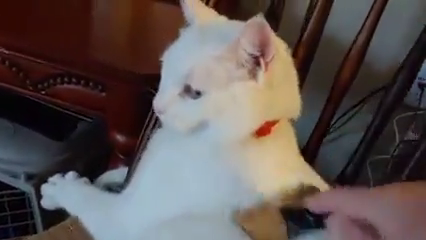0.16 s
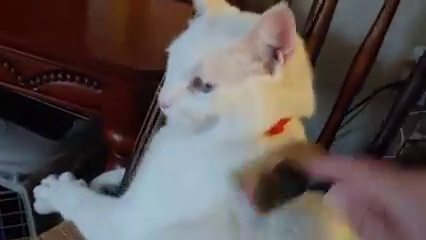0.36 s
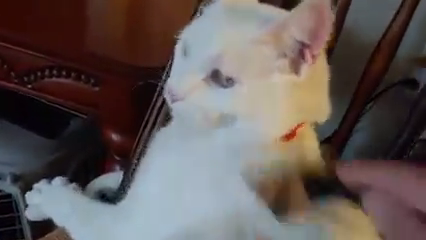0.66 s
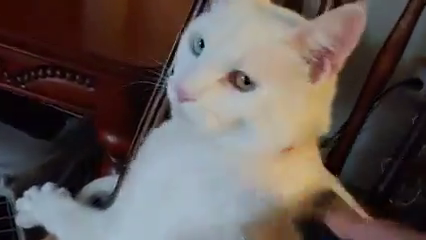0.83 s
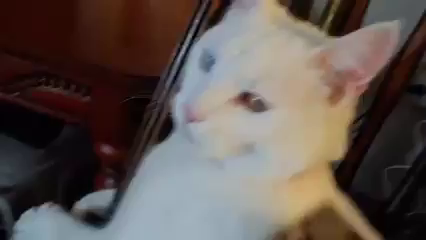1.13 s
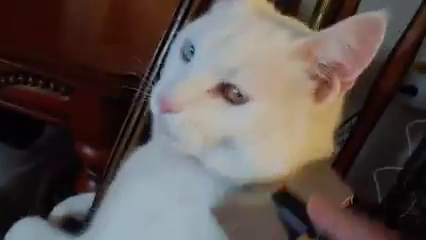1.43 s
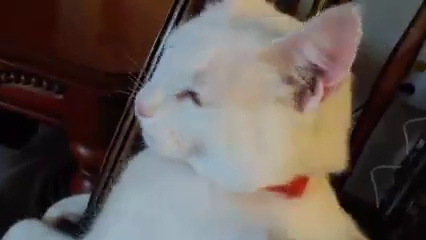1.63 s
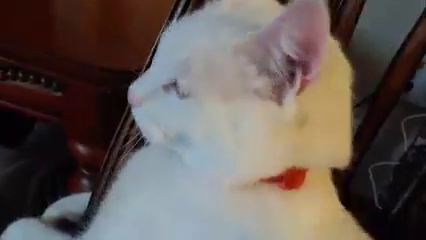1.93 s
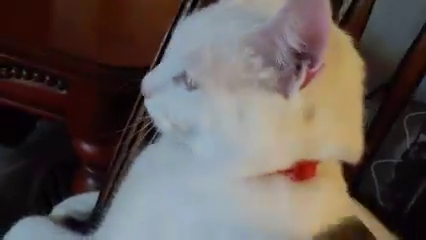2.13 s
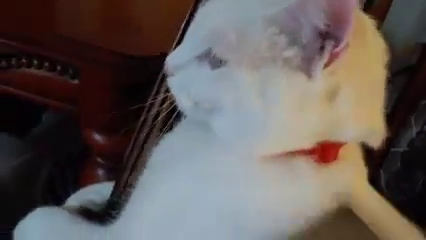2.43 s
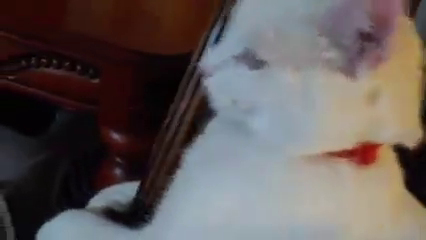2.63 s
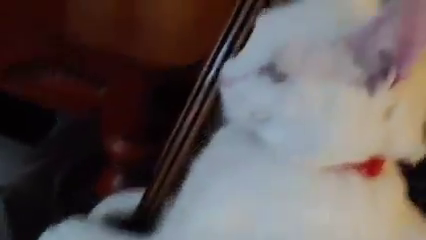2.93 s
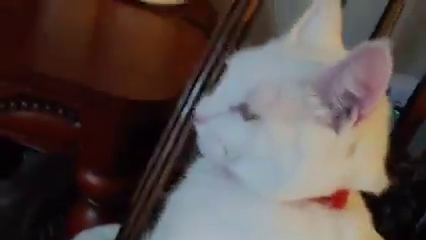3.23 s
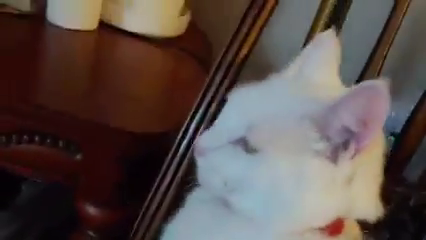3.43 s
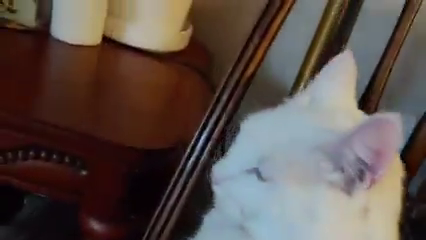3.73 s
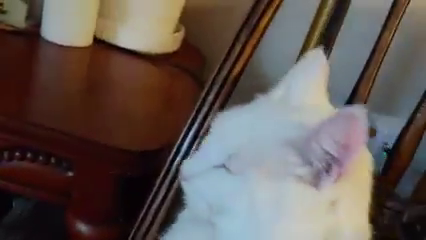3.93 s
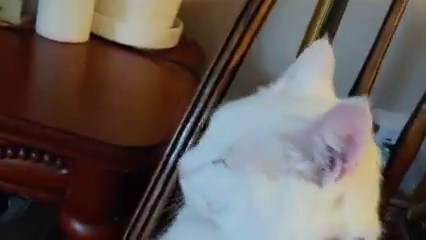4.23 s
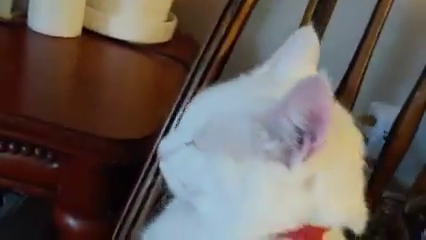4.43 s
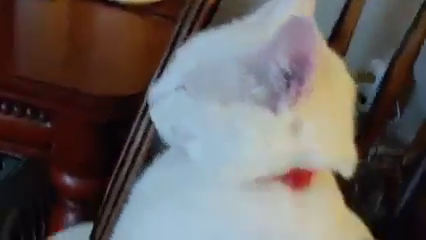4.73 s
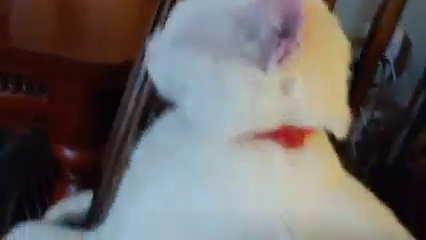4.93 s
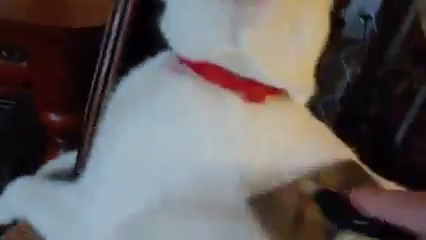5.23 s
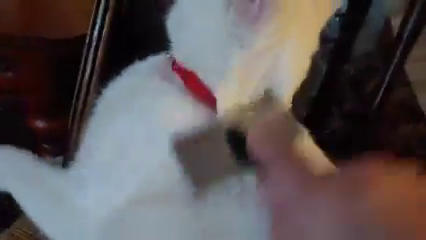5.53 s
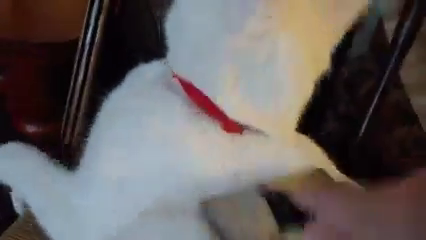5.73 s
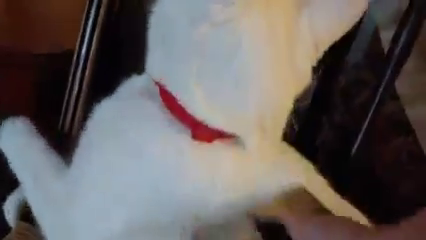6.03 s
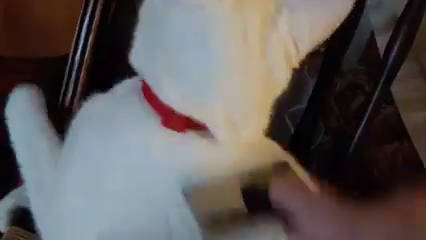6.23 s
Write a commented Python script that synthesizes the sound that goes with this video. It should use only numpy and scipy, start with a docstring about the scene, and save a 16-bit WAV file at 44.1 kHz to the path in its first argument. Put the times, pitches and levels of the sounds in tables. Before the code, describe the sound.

A close stereo pickup in a quiet furnished room with faint air noise and low appliance hum. From the start a wire-pin brush strokes a cat's coat roughly three times a second, each a soft crunchy pat followed by a bright, crackling, hissing rake. Around 1.6 to 1.8 seconds a firmer stroke snags: several sharp ticks, a short thin metallic ring, soft bumps, and the pulsing purr growing clearer until about 2.1. Lighter strokes continue, with a dull thump and small ticks near 3.0. From 3.7 strokes are more widely spaced; fluttering nose hiss comes at about 4.0 to 4.4, then a hollow wooden knock at 4.5. A strong rake peaks near 5.1. From 5.7 to 5.95 the loudest pin snaps crack toward the left with a faint wire ring, then quick brushing runs to the end at about 6.3 seconds.

```python
"""Pins crackle through fur: about three times a second a wire-pin brush pats down on a cat and rakes its coat.
Rakes are random pin flicks over sliding hiss, shaped by the pins' resonances; pats are short dense crunches.
Snagged pins tick, and freed wires ring as damped modes; the wooden chair bumps and knocks.
The cat purrs in pulses, as chest thumps and nose hiss; filtered noise and wavering tones make a quiet room."""
import sys
import numpy as np
from scipy import signal
from scipy.fft import rfft, irfft, next_fast_len
from scipy.io import wavfile
from scipy.ndimage import map_coordinates

SR = 44100
rng = np.random.default_rng(int(sys.argv[2]) if len(sys.argv) > 2 else 0)


def waveform_to_disk(signal):
    """Save audio, clipped to [-1, 1], as 16-bit WAV at the path in sys.argv[1]."""
    frames = np.transpose(np.atleast_2d(signal))
    scaled = np.clip(frames, -1, 1) * 32767
    samples = np.round(scaled).astype(np.int16)
    wavfile.write(sys.argv[1], SR, samples)


N = 280917  # length in samples


def amp(db):
    """Decibels to gain."""
    return 10 ** (np.asarray(db) / 20)


def unit(x):
    """Scale to rms 1."""
    return x / np.sqrt(np.mean(x ** 2) + 1e-20)


def clock():
    """The time of every sample, in seconds."""
    return np.arange(N) / SR


def curve(rows, t):
    """(s, value) rows joined by straight lines."""
    return np.interp(t, *np.transpose(rows))


def along(points, hz):
    """(Hz, value) points joined on a log frequency axis."""
    point_hz, values = np.transpose(points)
    return np.interp(np.log(hz + 1), np.log(point_hz + 1), values)


def wobble(x):
    """A smooth random curve with one knot per unit of x."""
    return map_coordinates(rng.standard_normal(int(x.max()) + 4), [x])


def coloured(x, spectrum, extra_db=lambda hz: 0):
    """Causal (minimum-phase) filter with the given spectrum."""
    size = 2 * next_fast_len(x.shape[-1] // 2 + 2048)
    hz = np.fft.rfftfreq(size, 1 / SR)
    gain = amp(along(spectrum, hz) + extra_db(hz))
    # folding the cepstrum onto positive time gives the minimum phase
    cepstrum = irfft(np.log(gain + 1e-6))
    cepstrum[1:size // 2] *= 2
    cepstrum[size // 2 + 1:] = 0
    response = np.exp(rfft(cepstrum))
    return irfft(rfft(x, size) * response, size)[..., :x.shape[-1]]


def pair(three, alike):
    """Left and right from one shared and two separate signals."""
    share = np.clip(alike, 0, 1)
    return np.sqrt(share) * three[0] + np.sqrt(1 - share) * three[1:]


def panned(x, pan_db):
    """Share the power between left and right; positive is left."""
    return x * unit(amp([[pan_db / 2], [-pan_db / 2]]))


def add(track, s, sound, lead_ms=0):
    """Mix a stereo sound in at time s, the right side earlier by lead_ms."""
    right = round(s * SR)
    left = right + round(lead_ms * SR / 1000)
    for side, start in enumerate([left, right]):
        part = sound[side, max(-start, 0):max(N - start, 0)]
        track[side, max(start, 0):][:len(part)] += part


def ring(modes, t, scatter_db):
    """Damped modes, at random phases and scattered strengths on each side."""
    out = 0
    for hz, db, t60 in modes:
        strength = amp(db + scatter_db * rng.standard_normal((2, 1)) - 60 * t / t60)
        out = out + strength * np.sin(2 * np.pi * hz * t + rng.uniform(0.17, 1, (2, 1)))
    return out


# still air's spectrum: pitch_hz [Hz], level_db [dB per Hz, relative]
AIR_SPECTRUM = [(20, -29), (40, 2), (70, 9.5), (110, -4), (250, -5.5), (350, -10), (950, -10),
                (1500, -22.5), (2500, -25), (5000, -29.5), (8000, -16.5), (11000, -35.5), (15500, -31)]
# appliance hum tones: pitch_hz [Hz], level_db [dB rms before the waver]
HUM_TONES = [(70.5, -69.5), (120, -79), (180, -76), (240, -76)]


def background(air_db=-66.5):
    """Still room air as filtered noise, and the hum of an appliance as tones wavering in level and phase."""
    air = unit(coloured(pair(rng.standard_normal((3, N)), 0.31), AIR_SPECTRUM))
    hum = 0
    for hz, db in HUM_TONES:
        level = amp(db + 4 * wobble(6 * clock())) * np.sqrt(2)
        hum = hum + level * np.sin(2 * np.pi * (hz * clock() + .2 * wobble(7 * clock())))
    return panned(amp(air_db) * air + hum, 0.19)


# room decay: pitch_hz [Hz], t60_s [s]
ROOM_DECAY = [(200, 0.37), (2000, 0.22), (7000, 0.1), (14000, 0.25)]


def room(x):
    """The furnished room answers with a brief noise tail, each frequency fading at its own rate."""
    hz, t, z = signal.stft(rng.standard_normal((2, SR // 3)), SR, nperseg=256)
    fade = amp(-60 * t / along(ROOM_DECAY, hz)[:, None])
    tail = signal.istft(z * fade, SR, nperseg=256)[1]
    tail = np.pad(tail / np.linalg.norm(tail[0]), ((0, 0), (SR // 400, 0)))  # the answer starts 2.5 ms late
    return signal.fftconvolve(x, tail, axes=1)[:, :N]


# chest purr, before trim and swell: time_s [s], level_db [dB]
PURR_LEVEL = [(0.0, -78), (1.01, -74), (1.84, -55), (2.0, -53.5), (2.13, -62.5), (2.41, -76), (2.91, -63.5),
              (3.12, -70), (4.06, -63.5), (5.48, -70), (5.92, -61.5), (6.37, -68)]
# chest resonances: pitch_hz [Hz], level_db [dB per Hz, relative]
CHEST_SPECTRUM = [(30, -21), (62, -4), (115, 1.5), (175, -2), (290, -4), (470, -7), (620, -20.5),
                  (790, -37.5), (950, -12.5), (1150, -43), (2000, -51.5)]
# fluttering hiss at the nose: time_s [s], level_db [dB]
FLUTTER_LEVEL = [(1.48, -85), (1.54, -59), (1.66, -61), (1.72, -80), (1.9, -72), (1.99, -61), (2.05, -90),
                 (3.94, -88), (3.99, -61.5), (4.13, -57), (4.2, -62), (4.38, -58), (4.44, -68), (4.48, -73)]
# nose hiss spectrum: pitch_hz [Hz], level_db [dB per Hz, relative]
NOSE_SPECTRUM = [(1500, -5.5), (4000, -30), (6000, -10), (7300, 13), (8800, 0.5), (10500, -30),
                 (15000, -46)]
# the chest sounds louder under each stroke: by how much, at what share of the swing, how wide
SWELL_DB, SWELL_AT, SWELL_S = 7, 0.68, 0.13


def pressure(t):
    """How firmly the brush leans on the cat, 0-1: one swell for each stroke."""
    swells = [np.exp(-((t - s - SWELL_AT * swing) / SWELL_S) ** 2) for s, _, _, swing, *_ in STROKE_LIST]
    return np.max(swells, axis=0)


def purr(purr_hz=29, pulse_decay=1.7, uneven_db=4.5, throat_db=4, chest_db=-5):
    """The larynx chops the cat's airflow: soft, uneven thumps in the chest, puffs of hiss at the nose."""
    t = clock()
    turns = np.cumsum(purr_hz * (1 + .06 * wobble(9 * t))) / SR
    air = unit(np.exp(-pulse_decay * (turns % 1)) * pair(rng.standard_normal((3, N)), 1.0))
    beats = unit(np.diff(np.floor(turns), prepend=0))
    drive = (air + .55 * beats) * amp(uneven_db * wobble(12 * t))
    # the cat shifts, and its body slowly trades one set of resonances for another
    shift = np.pi / 4 * (1 + np.tanh(2 * wobble(4 * t)))
    chest = 0
    for share in (np.cos(shift), np.sin(shift)):
        body = coloured(drive, CHEST_SPECTRUM, lambda hz: throat_db * wobble(hz / 28))
        chest = chest + share * unit(body)
    puffs = np.exp(2.2 * np.cos(2 * np.pi * turns)) * amp(1.6 * wobble(30 * t))
    nose = unit(coloured(puffs * pair(rng.standard_normal((3, N)), 0.074), NOSE_SPECTRUM, pin_notes))
    chest_level = amp(curve(PURR_LEVEL, t) + chest_db + SWELL_DB * pressure(t))
    nose_level = amp(curve(FLUTTER_LEVEL, t))
    return panned(chest_level * chest, 7) + panned(nose_level * nose, 7)


# soft bumps of the hand and the cat on the seat:
# start_s [s], level_db [dB], pitch_hz [Hz], t60_s [s], thud_db [dB over the push]
BUMP_LIST = [(1.525, -51, 67.6, 0.49, -24), (1.608, -52, 188, 0.26, -17), (1.686, -46, 125.5, 0.087, -1),
             (1.965, -50.5, 116.7, 0.49, -22), (2.066, -50.5, 178, 0.13, -7),
             (2.3358, -42.5, 111, 0.11, -19), (2.615, -47.5, 104.6, 0.15, -20), (2.66, -53, 149, 0.064, -4),
             (2.734, -49, 221, 0.088, -11), (2.97, -45.5, 196, 0.11, -8.5), (3.036, -27, 108, 0.055, -2),
             (3.074, -46, 66.2, 0.32, -27), (4.689, -46, 164, 0.062, 12.5), (5.687, -44, 130, 0.02, 13.5),
             (5.876, -45.5, 71.3, 0.27, -16)]
# dull thud: pitch_hz [Hz], level_db [dB per Hz, relative]
THUD_SPECTRUM = [(30, -19.5), (110, 12.5), (300, 5.5), (750, 2), (1200, -12), (3000, -48), (6000, -70)]
# hollow wood's notes: pitch_hz [Hz], level_db [dB, relative], t60_s [s]
WOOD_MODES = [(420, -10, .06), (500, -6, .17), (535, -7, .08), (590, 5, .135), (700, -16, .11),
              (781, -10, .1), (945, -1, .06), (975, -1, .07), (1035, 1.5, .15), (1294, -14, .11),
              (1530, -8, .05), (1750, 0, .085), (1830, 0, .06), (2020, -7, .07)]
KNOCK_S = 4.5105  # one hollow knock on wood


def bumps(knock_db=-37, clack_db=-44.5, thud_t60=0.0093, swell_share=0.03):
    """Bumps push the seat into a damped tone with a dull thud; a knock rings the wood, long notes swelling slowest."""
    out, t = np.zeros((2, N)), np.arange(SR // 2) / SR
    for s, db, hz, t60, thud_db in BUMP_LIST:
        push = np.sin(2 * np.pi * hz * t) * amp(-60 * t / t60)
        thud = coloured(pair(rng.standard_normal((3, len(t))), 0.7) * amp(-60 * t / thud_t60), THUD_SPECTRUM)
        add(out, s, panned(amp(db) * (push + amp(thud_db) * thud / np.abs(thud).max()), 8))
    wood = 0
    for hz, db, t60 in WOOD_MODES:
        swell = 1 - np.exp(-t / (swell_share * t60))
        wood = wood + ring([(hz, db, t60)], t, scatter_db=0.0) * swell
    clack_spectrum = [(200, -11), (500, 15), (1900, -0.5), (2700, -4), (5000, -35), (8000, -40)]
    clack = unit(coloured(rng.standard_normal((2, len(t))), clack_spectrum))
    knock = amp(knock_db) * wood + amp(clack_db - 60 * t / 0.17) * clack
    add(out, KNOCK_S, panned(knock, -0.48))
    return out


# snagged pins let go: start_s [s], peak_db [dB before pan], hardness_db [dB], pan_db [dB, left over right]
SNAP_LIST = [(1.0435, -34, -10, -2), (1.134, -34.5, -4, 2), (1.6109, -34, 9, -9), (1.6138, -25, 8.5, 2.5),
             (1.7, -25, -26, -11), (1.7227, -20.5, 6.5, 0), (1.7257, -19.5, 2.5, 0),
             (1.7613, -18.5, -17.5, -9.5), (2.3398, -38, 2, 1), (2.6673, -37, 3, 2), (2.977, -28, 3, -3),
             (3.0354, -25, -5, 10.5), (3.3075, -39, 1, 2), (3.39, -31.5, -24, -2), (5.6878, -21, 8.5, 11),
             (5.7108, -21.5, -7.5, 25), (5.7127, -28.5, 0, -4), (5.7825, -12, -3.5, 28),
             (5.7894, -10, 2, -3.5), (5.8943, -29, -14, 20), (5.9, -19.5, -11.5, 13),
             (5.9164, -16, -35, 12), (5.9214, -21, -17, 13), (6.065, -38.5, 10, 7), (6.24, -31, -14.5, 8),
             (6.255, -26, -6, 12)]
# snap tick: pitch_hz [Hz], level_db [dB per Hz, relative]
SNAP_SPECTRUM = [(400, -23), (1150, -32.5), (1500, -11), (1850, -4.5), (2700, -8), (3700, -5), (5200, -10),
                 (6500, -1.5), (7700, 10), (8800, -6), (11000, -10.5), (15500, -53)]
# handle's notes: pitch_hz [Hz], level_db [dB, relative], t60_s [s]
HANDLE_MODES = [(1665, 0.21, 0.026), (1900, -1.1, 0.017)]
HANDLE_DB = -28  # handle against the tick, before hardness is added
# a wire is left ringing: start_s [s], level_db [dB], pan_db [dB, left over right]
PING_LIST = [(1.7635, -30.5, 10.5), (5.7875, -45.5, 18)]
# wire pin's notes: pitch_hz [Hz], level_db [dB before scatter], t60_s [s]
WIRE_MODES = [(7060, -9, .11), (7560, -9, .16), (7880, -5, .1), (11430, -21, .2), (11670, -17, .1),
              (12188, 3.2, .185), (12260, -13, .12), (12510, -10, .065), (12940, -15, .21),
              (13440, -10, .06), (14480, -14, .04)]


def snaps(t60=.0065, pin_hz=7000, shimmer_db=-1):
    """A snagged pin springs back with a sharp tick that rings the handle; a freed wire rings on."""
    out, t = np.zeros((2, N)), np.arange(SR // 2) / SR
    short = t[:SR // 20]
    for s, db, hard_db, pan_db in SNAP_LIST:
        def spread(hz):
            """A hard release spreads far to both sides of the pins' own band."""
            away = 1 - np.exp(-np.log((hz + 1) / pin_hz) ** 2 / 0.098)
            return hard_db * away + pin_notes(hz) / 2

        burst = pair(rng.standard_normal((3, len(short))), 0.62) * amp(-60 * short / t60)
        tick = coloured(burst, SNAP_SPECTRUM, spread)
        tick = tick / np.abs(tick).max(axis=1, keepdims=True)
        handle = amp(HANDLE_DB + hard_db) * ring(HANDLE_MODES, short, scatter_db=0)
        add(out, s, panned(amp(db) * (tick + handle), pan_db))
    buzz_spectrum = [(5000, -29.0), (8000, 0), (12200, 11), (14300, -15), (15500, -32.0)]
    for s, db, pan_db in PING_LIST:
        buzz = unit(coloured(rng.standard_normal((2, len(t))), buzz_spectrum, pin_notes))
        shimmer = amp(shimmer_db - 60 * t / 0.19) * buzz
        wire = (ring(WIRE_MODES, t, scatter_db=-4.5) + shimmer) * (1 - np.exp(-t / 0.0055))
        add(out, s, panned(amp(db) * wire, pan_db))
    return out


# brush's place and angle on the cat: time_s [s], pan_db [dB, left over right],
# resonance_hz [Hz], brightness_db [dB], rub_db [dB, pad under the rake]
BRUSH_PATH = [(0, 3.5, 5730, -2, -23.5), (1.15, 2.5, 5200, -0.5, -22.5), (1.8, 4.5, 5430, 8.5, -25),
              (2.15, 4.5, 5400, 3.5, -25), (2.47, 3.5, 5650, -2, -15.5), (2.799, 1, 6200, -3, -18),
              (3.9, 2.5, 6740, -1.5, -31), (4.35, -8, 5770, 3.5, -21), (4.67, -2, 6140, -1.5, -24.5),
              (5.1, 1, 6200, -0.5, -43), (5.5, 5, 7020, -9.5, -25), (5.92, 8, 6570, -7, -33.5),
              (6.1, 7.5, 7200, 6.5, -40), (6.26, 8.5, 7340, -19, -30)]
# the right side hears the brush earlier, less so as the brush moves left
LEAD_MS, LEAD_MS_PER_DB = .1, .0135


def brush_at(s):
    """The brush at time s: left-right dB, lead of the right side in ms, resonance Hz, brightness dB, rub dB."""
    times, *columns = np.transpose(BRUSH_PATH)
    pan_db, *tone = [np.interp(s, times, column) for column in columns]
    return pan_db, LEAD_MS - LEAD_MS_PER_DB * pan_db, *tone


def pin_notes(hz, fine_db=5.2, fine_hz=34, broad_db=2.3, broad_hz=380):
    """Each handful of pins rings with its own narrow peaks: a random ripple in dB over frequency."""
    return fine_db * wobble(hz / fine_hz) + broad_db * wobble(hz / broad_hz)


def crackle(size, per_second, spread_db, hiss, alike):
    """Pins flick free at random moments and strengths, over the hiss of sliding hair."""
    flicks = rng.random((3, size)) < per_second / SR
    level_db = spread_db * np.clip(rng.standard_normal((3, size)), -2, 2)
    strength = amp(level_db) * rng.choice([-1, 1], (3, size))
    return pair(unit(flicks * strength) + hiss * rng.standard_normal((3, size)), alike)


def pull(t, rise, fall, shape, release_shape=1.5):
    """Force of a stroke, peaking at t = 0 and down to a tenth one rise before or one fall after."""
    return amp(-20 * np.where(t < 0, np.abs(t / rise) ** shape, np.abs(t / fall) ** release_shape))


# brush head: pitch_hz [Hz], level_db [dB per Hz, relative]
PAD_SPECTRUM = [(300, -31), (1100, -5.5), (1700, -2.5), (2800, -4.5), (4500, 2.5), (7800, 11.5), (8700, 6),
                (10500, -1), (12000, -34), (15500, -48)]
# the jolt's level against its snap [dB], growth with hardness [dB per dB] and fade [s]
JOLT_DB, JOLT_PER_HARD, JOLT_S = -15.5, 0.38, 0.0036
PAT_RISE_S = .005  # base of a pat's swell, before a share of its fade is added


def pats(rise_share=0.33, shift_db=-2):
    """Many pins touch almost together: a short crunch in the brush head at each landing and, jolted, each snap."""
    out, t = np.zeros((2, N)), np.arange(-SR // 16, SR // 6) / SR
    landings = [(s, db, fade) for s, db, fade, *_ in STROKE_LIST]
    jolts = [(s, db + JOLT_DB + JOLT_PER_HARD * hard_db, JOLT_S) for s, db, hard_db, _ in SNAP_LIST]
    for s, db, fade in landings + jolts:
        pan_db, lead_ms, *_ = brush_at(s)
        flicks = crackle(len(t), per_second=1500, spread_db=6, hiss=.5, alike=.35)
        crunch = unit(coloured(flicks, PAD_SPECTRUM, lambda hz: pin_notes(hz) / 2))
        swell = pull(t - .002, PAT_RISE_S + rise_share * fade, fade, 1.2, release_shape=1.1)
        add(out, s + t[0], panned(amp(db) * crunch * swell, pan_db + shift_db), lead_ms)
    return out


# the pins' main resonance at a usual stroke level; firmer strokes ring more
RESONANCE_DB, RESONANCE_AT_DB, RESONANCE_GROWS = 6, -42, 0.57


def bent(centre_hz, stroke_db, ring_db, hz, width_hz=950):
    """The bent pins' main resonance in a stroke of this strength, in dB over frequency."""
    height_db = RESONANCE_DB + ring_db + RESONANCE_GROWS * (stroke_db - RESONANCE_AT_DB)
    return height_db / (1 + ((hz - centre_hz) / width_hz) ** 4)


# strokes, each a pat and a rake: landing_s [s], pat_db [dB], pat_fade_s [s],
# swing_s [s from landing to greatest pull], rake_db [dB], fall_s [s],
# rise_shape [exponent: 1 pointed - 3 blunt], rasp_db [dB]
STROKE_LIST = [(-.05, -69, 0.035, 0.13, -37, 0.042, 3, -9), (0.279, -56.5, 0.034, 0.16, -36, 0.03, 3.1, -7),
               (.627, -50.5, 0.025, 0.15, -41, 0.05, 2.9, -1),
               (.979, -46.5, 0.036, 0.13, -38.5, 0.059, 3.2, -1),
               (1.304, -48.5, 0.052, 0.13, -39, 0.071, 2.1, 0.5),
               (1.6107, -35, 0.0084, 0.18, -31.5, 0.15, 2.2, 0.5),
               (2.02, -46.5, 0.065, 0.12, -37, 0.054, 2.3, 3.5),
               (2.339, -42.5, 0.022, 0.12, -40.5, 0.091, 1.76, 0),
               (2.664, -46.5, 0.045, 0.12, -38.5, 0.08, 2.8, 1.5),
               (2.976, -47, 0.034, 0.11, -38, 0.092, 1.7, 8.5),
               (3.306, -41.5, 0.038, 0.14, -42.5, 0.077, 5.9, 6.5),
               (3.668, -57, 0.057, 0.26, -34, 0.064, 2.1, 2.5),
               (4.2, -62.5, 0.16, 0.1, -43.5, 0.046, 1.34, -0.5),
               (4.513, -42, 0.038, 0.16, -39, 0.04, 1.26, -4),
               (4.93, -64.5, 0.057, 0.19, -30, 0.03, 2.24, -3),
               (5.307, -54.5, 0.022, 0.17, -37, 0.048, 1.06, 7),
               (5.683, -40, 0.021, 0.22, -33, 0.092, 2.6, 4),
               (6.101, -43, 0.071, 0.05, -43.5, 0.11, 1.3, 1),
               (6.14, -68, .04, 0.12, -32.5, 0.036, 2.54, -6.5)]
# raking pins: pitch_hz [Hz], level_db [dB per Hz, relative]
PIN_SPECTRUM = [(590, -34), (1000, -47), (1290, -31.5), (1840, -17), (3180, -14.5), (3650, -6.5),
                (4760, -8), (5520, -0.5), (6340, -2.5), (7950, 3.5), (8500, -7), (10100, -11.5),
                (11400, -49), (13100, -29.5), (15500, -75)]
# pad rubbing fur: pitch_hz [Hz], level_db [dB per Hz, relative]
FUR_SPECTRUM = [(60, -15.5), (170, 4.5), (330, -1.5), (460, -3), (610, -13.5), (800, -9), (950, -3.5),
                (1300, -13), (2500, -18.5)]
RISE_SHARE = 0.68  # rise time of the stroke as a share of its swing
LUMP_DB, LUMPS_PER_S = 4.5, 28  # the pad rubs unevenly over folds of skin


def strokes(rasp_hz=3600, bright_hz=6700, ring_grows_db=2.0, bite_s=0.037, snags_per_s=130, snag_db=-12):
    """Each stroke skims the coat with a broad hiss, then bites in and the pins ring; the pad rubs dully underneath."""
    out, t = np.zeros((2, N)), np.arange(-SR // 3, SR // 3) / SR
    for s, _, _, swing, db, fall, shape, rasp_db in STROKE_LIST:
        peak, rise = s + swing, RISE_SHARE * swing
        pan_db, lead_ms, centre_hz, bright_db, fur_db = brush_at(peak)
        bite = (1 + np.tanh((t + rise / 5) / bite_s)) / 2
        pins = 0
        # crossfade from skimming to biting
        for share, ring_db in [(1 - bite, -ring_grows_db), (bite, ring_grows_db)]:
            def tilt(hz):
                """Rasp below, brightness above, the main resonance and the pins' own notes."""
                rasp = rasp_db / (1 + (hz / rasp_hz) ** 8)
                bright = bright_db / (1 + (bright_hz / (hz + 1)) ** 10)
                return rasp + bright + bent(centre_hz, db, ring_db, hz) + pin_notes(hz)

            flicks = crackle(len(t), per_second=750, spread_db=3.2, hiss=.4, alike=.62)
            # a few pins catch harder
            snags = amp(snag_db) * crackle(len(t), per_second=snags_per_s, spread_db=8.0, hiss=0, alike=0.24)
            pins = pins + np.sqrt(share) * unit(coloured(flicks + snags, PIN_SPECTRUM, tilt))
        catches = amp(0.93 * wobble(70 * (t - t[0])))  # tangles make the pins' level waver
        pins = pins * catches * pull(t, rise, fall, shape) * (t > -swing)
        rub = unit(coloured(pair(rng.standard_normal((3, len(t))), 0.54), FUR_SPECTRUM, pin_notes))
        rub = rub * pull(t, 1.83 * rise, fall, 2.3)
        rub = rub * unit(amp(LUMP_DB * wobble(LUMPS_PER_S * (t - t[0]))))
        rake = amp(db) * pins + amp(db + fur_db) * rub
        add(out, peak + t[0], panned(rake, pan_db), lead_ms)
    return out


def scene(room_db=-13):
    """Brush, chair and cat in the room."""
    near = strokes() + pats() + snaps() + bumps() + purr()
    return near + amp(room_db) * room(near) + background()


TOP_HZ = 15700  # band limit


def record(dry):
    """Nothing passes above the band limit."""
    size = next_fast_len(N + SR // 4)
    passes = np.fft.rfftfreq(size, 1 / SR) < TOP_HZ
    return irfft(rfft(dry, size) * passes, size)[:, :N]


dry = scene()
out = record(dry)
waveform_to_disk(out)
```